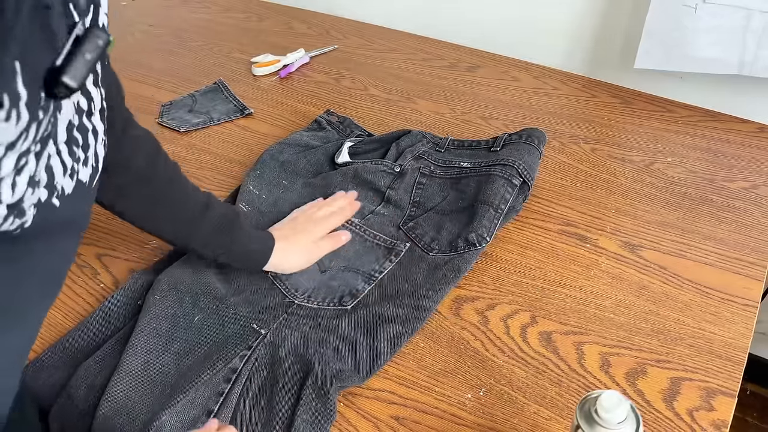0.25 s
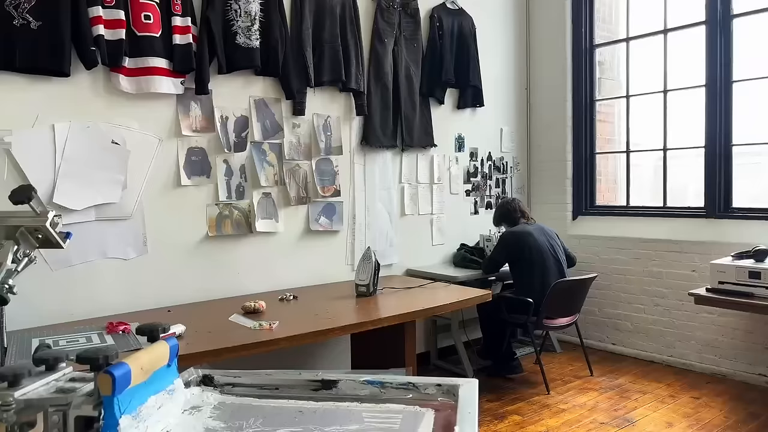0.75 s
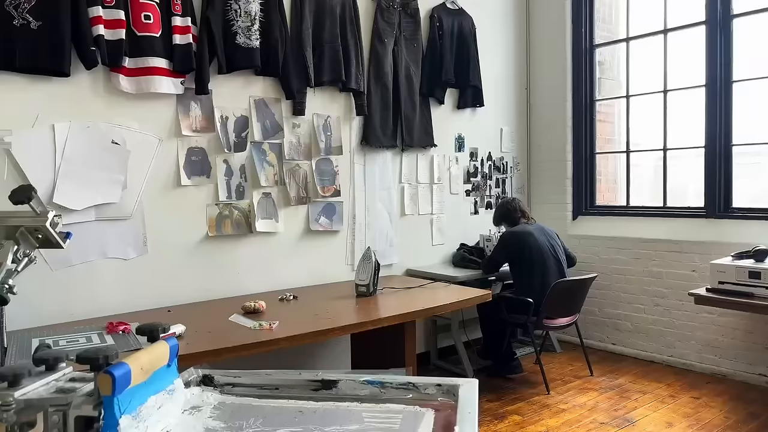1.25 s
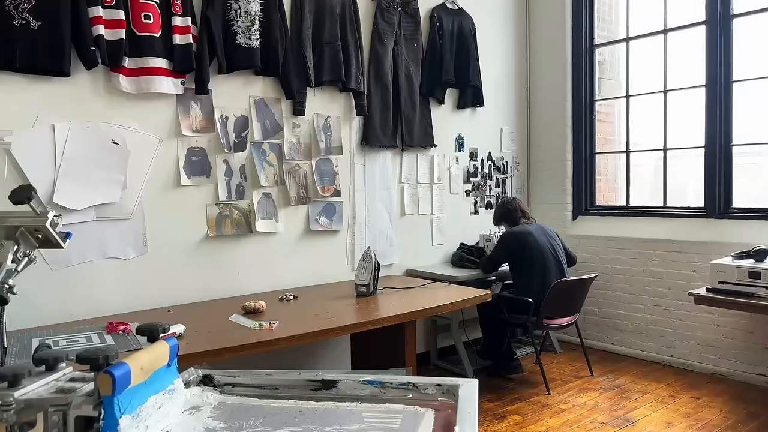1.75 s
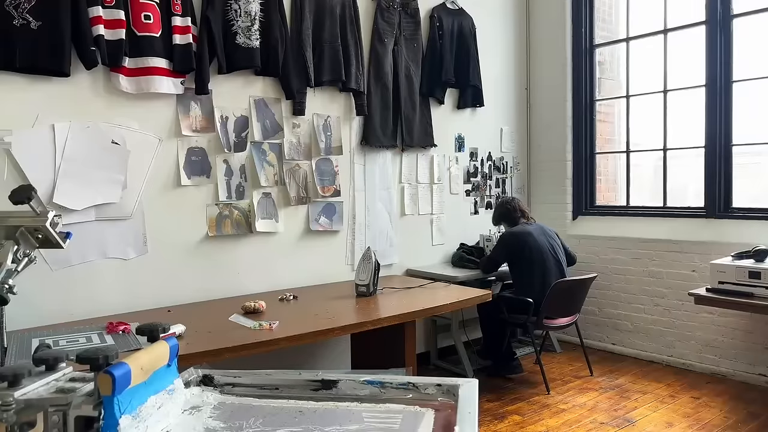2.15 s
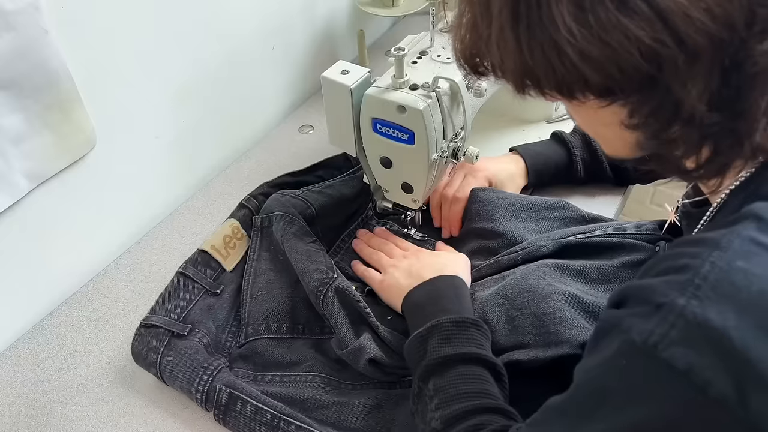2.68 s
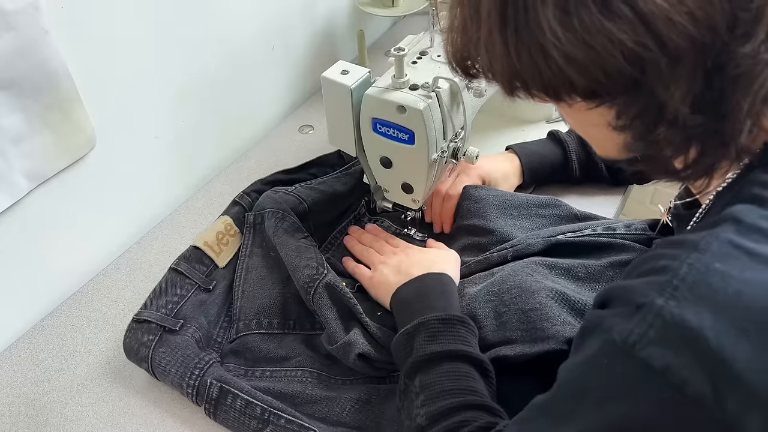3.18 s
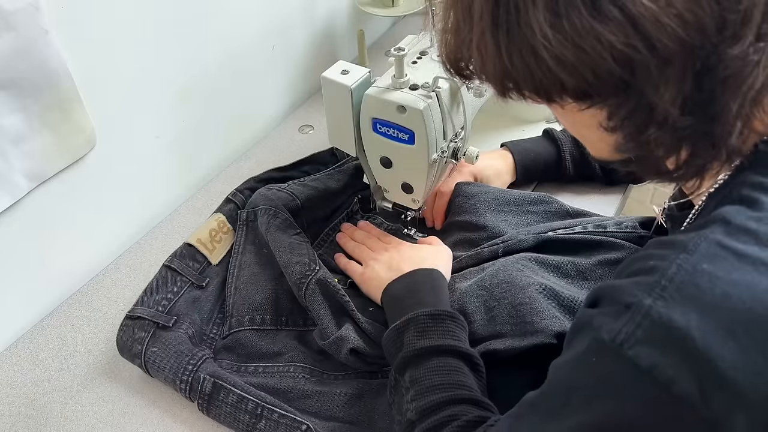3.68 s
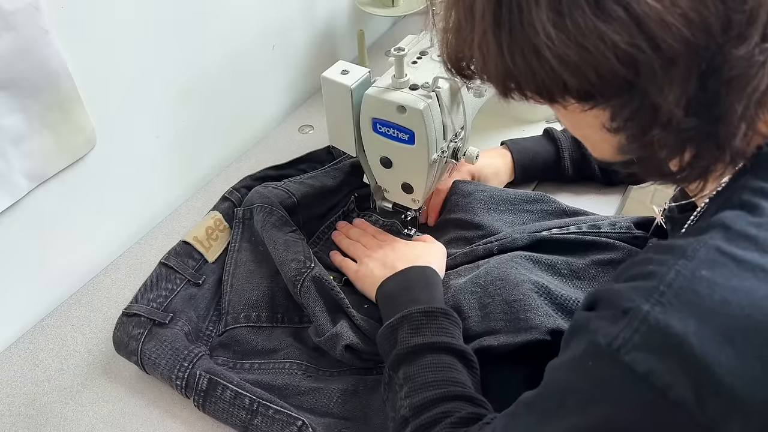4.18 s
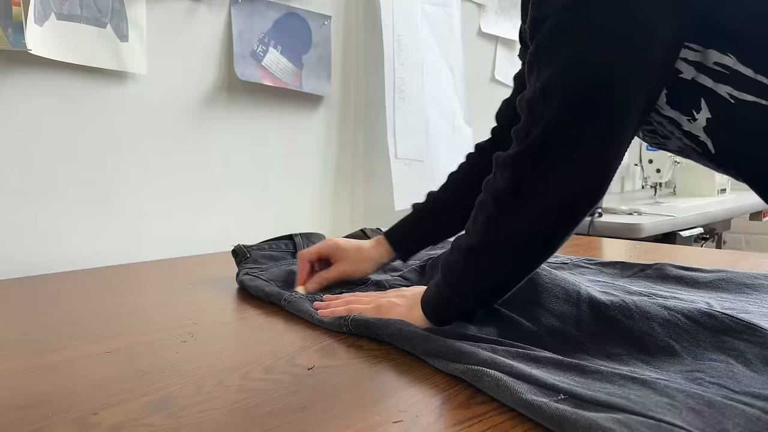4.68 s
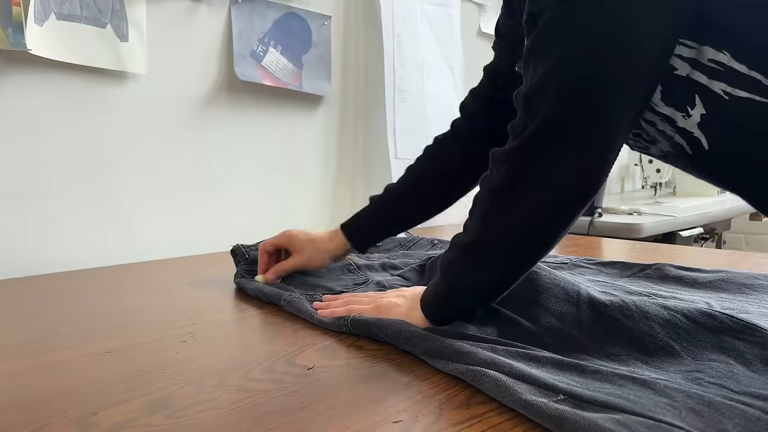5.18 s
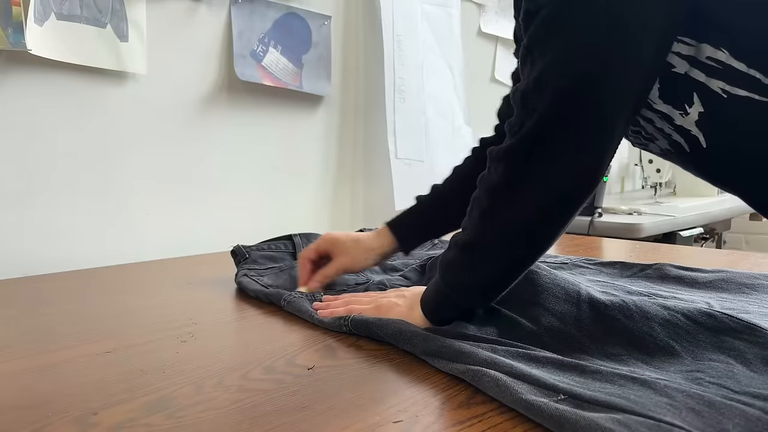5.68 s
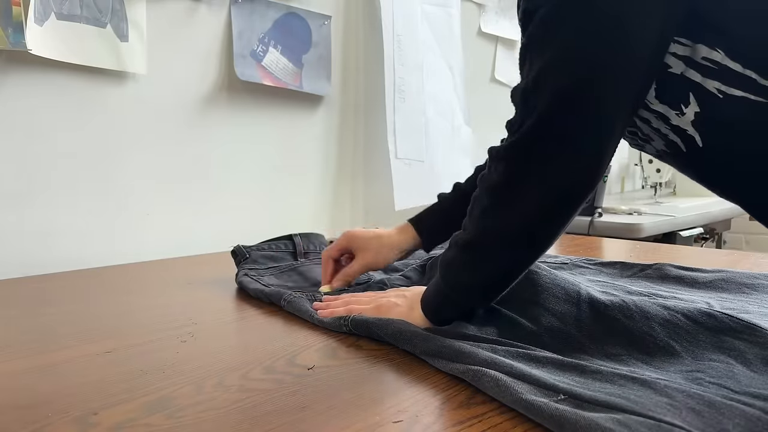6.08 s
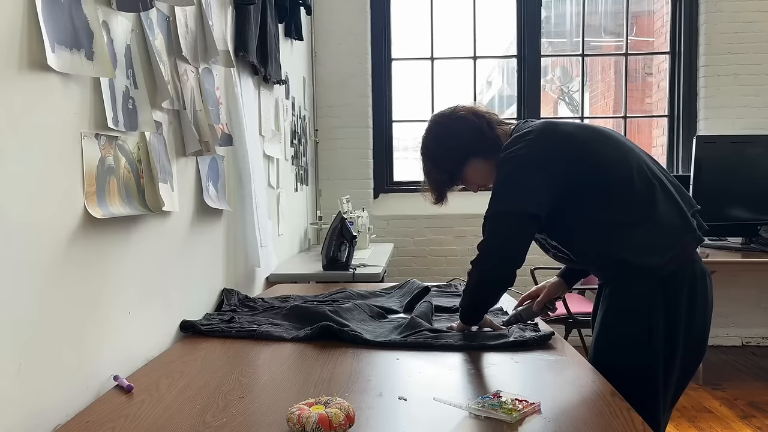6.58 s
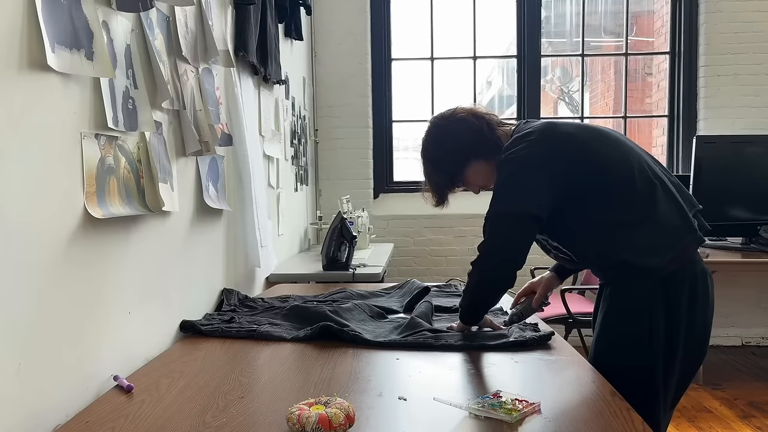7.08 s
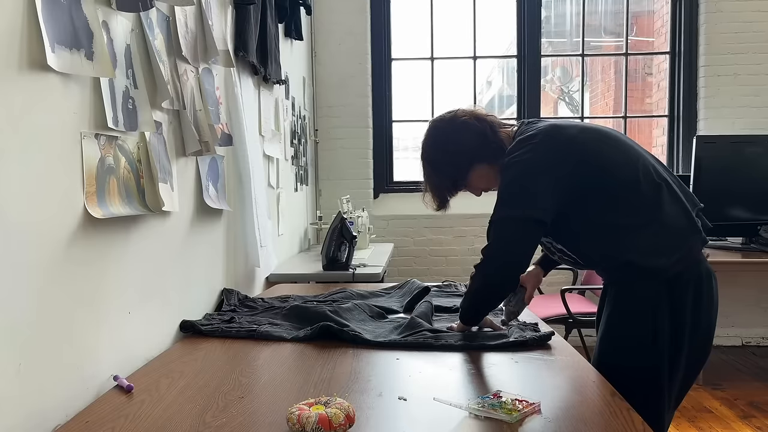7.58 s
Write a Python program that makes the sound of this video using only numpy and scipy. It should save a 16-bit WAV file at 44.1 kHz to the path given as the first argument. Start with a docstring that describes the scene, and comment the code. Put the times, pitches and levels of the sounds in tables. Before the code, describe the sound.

A hand brushes faintly over denim, above a low workshop rumble that swells and sinks throughout. At 0.4 seconds a distant sewing machine cuts in, clacking about seven stitches a second with small pings and rasps, and one sharp click at 1.8 seconds. At 2.4 seconds the machine is suddenly close, louder and about twice as fast, rocking its table, its clacks sharpening toward 4 seconds. It then coasts with a few lighter clicks and ends at 4.4 seconds. Quiet, gritty strokes rub over the cloth until 6.4 seconds, with a few faint taps. Then a handheld rotary tool starts abruptly, with a high, buzzing whine that wavers slightly in pitch. Its bit grinds the denim in short presses, with hiss and thin squeaks, until the end near 7.9 seconds. Its cooling air puffs against the microphone, most strongly around 6.8 seconds.

```python
"""Denim in a sewing workshop

Five shots cut together: a hand smooths denim; a sewing machine clacks through its stitches far off,
then close by until it slows to a stop; short strokes rub over the cloth; and a mains rotary tool
whines and grinds on the denim while its cooling air puffs against the microphone."""
import sys
import numpy as np
from scipy import signal
from scipy.fft import rfft, irfft, next_fast_len
from scipy.io import wavfile
from scipy.ndimage import uniform_filter1d

SR = 44100
rng = np.random.default_rng(int(sys.argv[2]) if len(sys.argv) > 2 else 0)


def master(y):
    """Save y as 16-bit WAV."""
    cut = np.clip(np.atleast_2d(y).T, -1, 1)
    pcm = np.round(cut * 32767)  # scale
    wavfile.write(sys.argv[1], SR, pcm.astype(np.int16))


N = 346185
TIME = np.arange(N) / SR
SIZE = next_fast_len(N + SR // 4)
HZ = np.arange(SIZE // 2 + 1) * SR / SIZE + 1e-3
PEDAL_UP_S, MACHINE_CUT_S, TOOL_CUT_S = 4.078, 4.42, 6.41

# stitches heard far off: (time [s], arm clack [dB], feed effort [dB], needle ping [dB])
FAR_STITCHES = [(0.4219, -40.5, -6, -40), (0.5494, -36, -1, -43.5), (0.6806, -37, 1, -45),
                (0.8127, -39, -1, -47), (0.9459, -41, -0.5, -40.5), (1.0816, -35.5, 3.5, -41),
                (1.219, -36, 0, -37.5), (1.3497, -38.5, 2.5, -40), (1.487, -36, -5, -38.5),
                (1.631, -38.5, -4.5, -39.5), (1.7879, -41, 6.5, -42), (1.9308, -35.5, 1, -42),
                (2.0644, -38, -1.5, -51), (2.194, -36, -1, -41.5), (2.3148, -41, 3, -36),
                (2.4457, -39, 0, -58)]
# stitches heard close by: (time [s], arm clack [dB], feed effort [dB], hook rattle [dB])
NEAR_STITCHES = [(2.4494, -33, -17, -29), (2.5371, -34, 1.5, -28.5), (2.6206, -30, -0.5, -27.5),
                 (2.702, -28, -4, -31.5), (2.7794, -29.5, -1, -31.5), (2.856, -27.5, 0, -29.5),
                 (2.9284, -28, 3, -28.5), (3.0033, -27.5, 0.5, -31), (3.073, -31, -3, -32),
                 (3.1451, -34, 5.5, -31.5), (3.2153, -25, 3.5, -29), (3.2886, -27, 2.5, -29.5),
                 (3.3595, -26.5, 3, -30.5), (3.434, -25.5, 2.5, -28.5), (3.5033, -29.5, 6.5, -34),
                 (3.5768, -25.5, -1, -29.5), (3.6486, -28.5, 3.5, -30), (3.7205, -26, 2.5, -29),
                 (3.7922, -23.5, 0, -30), (3.8642, -25.5, 3.5, -30), (3.938, -24, -2.5, -31),
                 (4.0209, -29, -3.5, -33.5), (4.2346, -33.5, -17, -34)]
# broad tone of the slow-running machine: (frequency [Hz], level [dB])
SLOW_SPECTRUM = [(71, -42.5), (120, -4), (188, -18), (236, 0.5), (284, -13.5), (524, -4.5), (742, -14.5),
                 (1050, -2), (2530, 0.5), (5300, -22.5), (15000, -37.5), (16000, -33)]
# its body modes: (frequency [Hz], width [Hz], level [dB])
SLOW_MODES = [(248, 5.4, -4), (473, 160, -2), (1051, 41, -2.5), (1207, 37, -3.5), (1930, 14, -4.5),
              (2290, 110, -3.5), (2517, 35, 0.5), (6300, 190, -22), (7540, 130, -28), (8000, 180, -25),
              (8570, 200, -27), (9800, 220, -34), (14900, 89, -21.5), (15200, 51, -32), (15400, 47, -33)]


def from_db(db):
    """Gain of a level in dB."""
    return 10 ** (np.asarray(db) / 20)


def curve(points):
    """A line through (time, value) points, at every sample."""
    return np.interp(TIME, *np.transpose(points))


def shot(start, end):
    """One while a shot lasts, with hard cuts."""
    return np.clip(np.minimum(TIME - start, end - TIME) / .002, 0, 1)


def trapezoid(start, rise, hold, fall):
    """Zero, up to one, held, back to zero."""
    return np.interp(TIME, np.cumsum([start, rise, hold, fall]), [0, 1, 1, 0])


def wander(per_s):
    """Slow random drift, spread about 1."""
    knots = np.clip(rng.standard_normal(400), -2, 2)
    return np.interp(TIME * per_s, np.arange(400), knots)


def gritty(grit_db, grains_per_s):
    """Noise whose loudness jumps from grain to grain; rms 1."""
    steps = rng.exponential(1, int(N / SR * 4000))[(TIME * grains_per_s).astype(int)]
    noise = rng.standard_normal(N) * from_db(grit_db * np.minimum(steps, 4))
    return noise / noise.std()


def resonance(hz, width_hz):
    """Response of one mode, 1 at its peak."""
    return 1 / (1 + 1j * (HZ ** 2 - hz ** 2) / (HZ * width_hz))


def colour(spectrum, modes=(), broad_db=0):
    """A broad spectrum with modes standing out of it."""
    hz, db = np.transpose(spectrum)
    broad = from_db(np.interp(np.log(HZ), np.log(hz), db) + broad_db)
    return broad + sum(from_db(db) * resonance(hz, width) for hz, width, db in modes)


def through(x, response, low_hz, high_hz):
    """Filter by one band of a response, scaled so that white noise keeps its power."""
    band = response / np.sqrt((1 + (low_hz / HZ) ** 8) * (1 + (HZ / high_hz) ** 8))
    band = band / np.sqrt(np.mean(np.abs(band) ** 2))
    return irfft(rfft(x, SIZE) * band, SIZE)[:N]


def rumble_levels():
    """Deep and upper rumble in dB: each shot has a wandering floor, and swells rise out of it."""
    # floor of each shot: (start [s], deep [dB], upper [dB], wander [dB])
    floors = [(0, -47.5, -62, -1.5), (.42, -55, -53, 3), (2.43, -40, -49.5, 0.5), (4.07, -53, -61, 3),
              (6.42, -73, -75, 0)]
    # low swells: (peak time [s], rise [s], fall [s], deep [dB], upper [dB])
    swells = [(0.001, 0.013, 0.14, -34, -61), (.39, .1, .3, -45, -55), (1.3, .6, 0.68, -49, -48.5),
              (1.8, 0.23, .4, -47, -49.5), (2.47, .1, 0.44, -36.5, -43), (4.07, .1, 0.71, -44.5, -52),
              (4.72, .08, .8, -53, -53.5), (5.08, 0.07, .45, -57, -43), (5.25, 0.23, 0.34, -42, -51.5),
              (5.46, 0.072, 0.53, -42, -63), (6.3, 0.13, 0.56, -41.5, -56), (6.82, 0.077, 0.1, -27, -40),
              (7.03, .12, 0.22, -32, -43.5), (7.3, .3, .1, -50, -60), (7.5, 0.13, 0.14, -47, -66),
              (7.74, 0.24, 0.25, -48.5, -53)]
    span_db = 26   # climbed in the rise, lost in the fall
    starts, *bands, wander_db = np.transpose(floors)
    now = np.searchsorted(starts, TIME, "right") - 1
    levels = []
    for band, floor_db in enumerate(bands):
        swells_db = [db[band] - span_db * np.maximum((at - TIME) / rise, (TIME - at) / fall)
                     for at, rise, fall, *db in swells]
        levels.append(np.max([floor_db[now] + wander_db[now] * wander(8.3), *swells_db], axis=0))
    return levels


def table_shake():
    """The needle bar rocks the table once a stitch."""
    # rocking motion: (multiple of the stitch rate, level [dB], lag [turns])
    harmonics = [(1, 3, 0.32), (2, 2.5, 0.26), (3, -4.5, 0.18)]
    times = np.array(NEAR_STITCHES)[:, 0]
    turns = np.interp(TIME, times, np.arange(len(times)))
    return sum(from_db(db) * np.cos(2 * np.pi * k * (turns - lag)) for k, db, lag in harmonics)


def rumble():
    """Building and handling rumble; close to the machine the rocking table carries the deep part."""
    deep_db, upper_db = rumble_levels()
    deep = through(rng.standard_normal(N), 1 / HZ, 8.8, 31.4)
    upper = through(rng.standard_normal(N), 1 / HZ, 53.5, 116)
    rocking = np.interp(TIME, [2.42, 2.45, 4.0, 4.08], [0, 1, 1, 0])
    deep = (1 - 0.73 * rocking) * deep + rocking * table_shake()
    return from_db(deep_db - 2.5) * deep + from_db(upper_db - 1.5) * upper


def clacks_and_taps():
    """Needle bar clacks growing louder over the last fast stitches, plus scattered clicks and taps."""
    # noisy cracks with a thin tick on top: (time [s], peak [dB], centre [Hz], tick against crack [dB])
    hits = [(0.346, -47, 1150, -30), (1.834, -12, 3240, -43), (2.857, -27, 3500, -31),
            (2.929, -28, 3500, -35), (3.487, -23.5, 2230, -27), (3.704, -29, 2226, -29),
            (3.776, -24, 2260, -27), (3.839, -18.5, 2090, -31), (3.846, -31, 2240, -25),
            (3.918, -17.5, 2110, -28), (3.999, -18.5, 2214, -27), (4.146, -34, 2500, -30),
            (4.179, -22.5, 2260, -34), (4.255, -37, 2170, 4), (4.306, -35, 2660, -30),
            (4.373, -41, 2500, -29), (4.39, -26.5, 2370, -28), (4.417, -41, 2350, -5),
            (4.673, -39, 1120, -31), (4.675, -41, 2600, -12), (5.032, -44, 1150, -28),
            (5.872, -36, 2040, -27), (6.251, -35, 1370, -19)]
    t60_s = 0.038
    out, t = np.zeros(N), TIME[:SR // 10]
    tick_band = signal.butter(2, [4500, 9000], "band", fs=SR, output="sos")
    for at, db, hz, tick_db in hits:
        burst = (rng.standard_normal(len(t)) + 14 * (t == 0)) * from_db(-60 * t / t60_s)
        crack_band = signal.butter(2, [hz / 1.27, hz * 1.196], "band", fs=SR, output="sos")
        crack, tick = signal.sosfilt(crack_band, burst), signal.sosfilt(tick_band, burst)
        tap = crack / np.abs(crack).max() + from_db(tick_db) * tick / np.abs(tick).max()
        out[int(at * SR):][:len(t)] += from_db(db) * tap
    return out


def cloth_strokes():
    """Strokes drag over the twill ribs: fine grit swelling out of a faint rustle."""
    # strokes on the denim: (start [s], rise [s], hold [s], fall [s], peak [dB])
    strokes = [(0.141, .024, .002, 0.013, -57.5), (0.343, 0.0063, .02, .03, -57),
               (4.405, .01, .002, 0.18, -50), (4.683, 0.033, .01, 0.11, -52),
               (4.688, 0.078, .01, 0.24, -45), (5.025, 0.021, .002, 0.028, -57),
               (5.074, 0.024, 0.11, 0.019, -47), (5.179, 0.088, 0.0092, 0.12, -57),
               (5.403, .008, .02, .03, -58.5), (5.404, .12, 0.013, .16, -47),
               (5.602, 0.1, 0.065, 0.027, -52.5), (5.776, 0.11, .01, 0.18, -49.5),
               (5.967, 0.1, .01, 0.16, -50.5), (6.184, 0.072, .005, 0.14, -46),
               (6.35, 0.061, .02, .01, -53)]
    # smoothing shot, then rubbing shot: (start [s], end [s], rustle [dB], treble below rustle [dB],
    # treble's share of a stroke's rise, grit [dB])
    shots = [(0, 0.424, -66, 10, 0.46, -0.2), (4.416, 6.418, -71, 11.5, 0.87, 2.03)]
    # tone of a palm over denim: (frequency [Hz], level [dB])
    palm = [(120, -23), (250, -12), (700, -11.5), (1400, -14.5), (2340, -7.5), (3600, -19.5), (12000, -32),
            (16000, -42)]
    # tone of the rubbing: (frequency [Hz], level [dB])
    rubbing = [(71, -27), (120, -23), (173, -4.5), (272, -10), (308, -9), (643, -5.5), (805, -11),
               (1400, -0.5), (1790, -4), (15000, -25.5), (16000, -40)]
    fullness = 0.79   # under 1: a stroke fills out early and thins late
    out = 0
    for (start, end, rest_db, below_db, share, grit_db), spectrum in zip(shots, (palm, rubbing)):
        swells_db = [(db - rest_db) * trapezoid(*timing) ** fullness for *timing, db in strokes]
        rise_db = np.max(swells_db, axis=0)
        grit, tone = gritty(grit_db, 600) * shot(start, end), colour(spectrum)
        out += through(from_db(rest_db + rise_db) * grit, tone, 120, 3380)
        out += through(from_db(rest_db - below_db + share * rise_db) * grit, tone, 3540, 16000)
    return out


def air_puffs():
    """Cooling air hits the microphone port: a quick push, then a slower swing back."""
    # gusts: (time [s], level [dB], time scale [s])
    puffs = [(6.804, -27.5, 0.0074), (7.016, -42, 0.0079), (7.064, -47, 0.008), (7.162, -50, 0.0069),
             (7.495, -41.5, 0.0085), (7.713, -49.5, 0.009)]
    pressure = np.zeros(N)
    for at, db, length in puffs:
        t = (TIME - at) / length
        pressure += from_db(db) * (np.exp(-2.6 * t ** 2) - 0.27 * np.exp(-(t - 1.8) ** 2))
    flutter = through(rng.standard_normal(N), 1, 40, 202)
    return pressure * (1 + 0.72 * flutter)


def bit_squeaks():
    """The bit squeaks on the cloth in short, slightly rough glides."""
    # squeaks: (start [s], length [s], from [Hz], to [Hz], peak [dB])
    squeaks = [(6.44, .05, 4640, 4780, -60), (6.613, 0.11, 4860, 4820, -49), (6.68, .04, 5050, 4940, -52),
               (6.77, .09, 4820, 4860, -58), (6.885, .035, 5100, 4900, -64), (7.09, .09, 5200, 5140, -53)]
    out, jitter_hz = 0, 18 * wander(45)
    for start, length, from_hz, to_hz, db in squeaks:
        along = np.clip((TIME - start) / length, 0, 1)
        hz = from_hz + (to_hz - from_hz) * along ** 1.5 + jitter_hz
        out += from_db(db) * np.sin(np.pi * along) * np.sin(2 * np.pi * np.cumsum(hz) / SR)
    return out


def bearing_squeals():
    """Bearing squeals and patches of sizzle: bands of noise, each flickering on its own."""
    # squeal bands: (frequency [Hz], width [Hz], relative level [dB], flicker [dB])
    bands = [(4820, 47, -11, 5.5), (6910, 640, -14, 7), (8100, 170, -10.5, 6), (9100, 160, -17, 6),
             (9650, 720, -16.5, 7), (10800, 980, -20, 8.5), (12100, 2000, -23, 9), (13600, 1200, -19, 6),
             (15200, 1000, -15.5, 4)]
    out, white = 0, rng.standard_normal(N)
    for hz, width, db, flicker_db in bands:
        knots = np.clip(rng.standard_normal(200), -2, 1.5)
        flicker = np.interp(TIME * 25, np.arange(200), knots)
        whistle = through(white, resonance(hz, width) ** 2, 100, 20000)
        out += from_db(db + flicker_db * flicker) * whistle
    return out


def bit_pressure_db():
    """Each press of the bit on the cloth comes on quickly, holds and eases off."""
    # presses: (start [s], hold [s], strength [dB])
    presses = [(6.382, 0.4, -2), (6.84, .2, -5), (7.172, 0.13, -1.5), (7.407, 0.063, -0.5), (7.649, .02, 1),
               (7.678, 0.033, -0.5), (7.841, .1, 1.5)]
    lifted_db, rise_s, fall_db_per_s = -10, 0.019, 144
    level_db = np.full(N, lifted_db)
    for start, hold, db in presses:
        attack_db = np.minimum(lifted_db * (start - TIME) / rise_s, 0)
        release_db = fall_db_per_s * (start + hold - TIME)
        level_db = np.maximum(level_db, db + np.minimum(attack_db, release_db))
    return level_db


def grinding(press_db, buzz_db, hiss_db, mains):
    """The bit grinds the denim: one gritty noise in three bands, louder under pressure."""
    # broad tone of the grinding: (frequency [Hz], level [dB])
    spectrum = [(88, -64), (150, -15), (244, -14), (297, -9.5), (504, -2.5), (805, -18), (979, -9),
                (2180, 6.5), (2870, -4.5), (4160, -17), (5460, -28), (8230, -28), (16000, -45)]
    # modes of the tool's body: (frequency [Hz], width [Hz], level [dB])
    modes = [(1400, 500, -8.5), (2260, 380, -9), (3400, 510, 2), (6000, 410, -16)]
    # tone of the hiss: (frequency [Hz], level [dB])
    hiss_spectrum = [(2650, -25), (4500, 2), (5450, -6.5), (6030, -4), (7570, -10.5), (8200, -8),
                     (8640, -13.5), (15100, -23), (16000, -13.5)]
    grit = gritty(1.7, 1200) * (1 + 0.041 * mains)
    body = colour(spectrum, modes, broad_db=3.5)
    dips_db = 0.09 * (buzz_db - buzz_db.max())   # the grinding dips slightly with the buzz
    low = through(from_db(-40.5 + 0.29 * press_db + dips_db) * grit, body, 150, 2700)
    top = through(from_db(-50.5 + press_db + dips_db) * grit, body, 3400, 4200)
    hiss = through(from_db(hiss_db - 3) * grit, colour(hiss_spectrum), 4800, 22000)
    return low + top + hiss


def housing_ring(drive, modes):
    """The tool's housing rings with a drive; rms 1 over the tool's shot."""
    response = sum(from_db(db) * resonance(hz, width) ** 2 for hz, width, db in modes)
    ring = through(drive, response, 300, 20000)
    return ring / ring[TIME > TOOL_CUT_S].std()


def commutator(angle, mains, buzz_db):
    """Commutator tones sound while current flows, twice a mains cycle, and ring the housing."""
    # commutator overtones: (multiple of the shaft speed, level [dB])
    orders = [(16, 4), (24, -3.5), (32, -10)]
    # housing modes of the lower whine: (frequency [Hz], width [Hz], level [dB])
    lower_modes = [(3850, 400, 2), (5620, 300, 0), (7950, 300, -16)]
    # housing modes of the upper whine: (frequency [Hz], width [Hz], level [dB])
    upper_modes = [(4180, 280, 0), (4490, 330, 1), (5940, 400, -6)]
    # loudness of the upper whine: (time [s], level [dB])
    upper_levels = [(6.41, -56), (6.95, -52.5), (7.05, -52), (7.14, -47.5), (7.3, -50.5), (7.5, -51.5),
                    (7.62, -50.5), (7.72, -51.5), (7.85, -48)]
    bars, buzz_hz, buzz_width_hz = 8, 2210, 364
    sharp_pulses, soft_pulses = np.exp(7.5 * (mains - 1)), np.exp(2.2 * (mains - 1))
    overtones = sum(from_db(db) * np.sin(k * angle) for k, db in orders)
    buzz = housing_ring(sharp_pulses * np.sin(bars * angle), [(buzz_hz, buzz_width_hz, 0)])
    lower = housing_ring(sharp_pulses * overtones, lower_modes)
    upper = housing_ring(soft_pulses * overtones, upper_modes)
    turned = np.clip((TIME - 6.93) / .15, 0, 1)   # the tool turns another side to the microphone
    lower_db = -52.5 - 2 * turned + 3 * wander(22)
    return from_db(buzz_db) * buzz + from_db(lower_db) * lower + from_db(curve(upper_levels)) * upper


def rotary_tool():
    """A mains motor spins the bit: commutator, fan and unbalance tones all follow its shaft."""
    # shaft speed: (time [s], speed [turns/s])
    speeds = [(6.41, 246.1), (6.86, 246.8), (7.0, 250.8), (7.07, 252), (7.17, 259), (7.25, 252.3),
              (7.31, 250.3), (7.41, 256.8), (7.52, 250), (7.635, 264.3), (7.73, 252.2), (7.83, 263),
              (7.85, 263)]
    # hum of the unbalanced shaft: (multiple of the shaft speed, level [dB])
    unbalance = [(1, -3), (2, -3), (3, -16), (4, -7), (5, -8), (6, -9), (7, -10)]
    # loudness of the commutator buzz: (time [s], level [dB])
    buzz_levels = [(6.41, -33.5), (6.785, -32), (6.806, -44), (6.862, -35.5), (6.91, -39), (6.974, -30),
                   (7.03, -44), (7.132, -35), (7.212, -35), (7.288, -42), (7.352, -36), (7.452, -42),
                   (7.484, -34.5), (7.504, -47), (7.624, -45), (7.684, -39.5), (7.85, -39)]
    pulses_per_s, fan_blades = 120, 18
    angle = 2 * np.pi * np.cumsum(uniform_filter1d(curve(speeds), size=1100)) / SR
    mains = np.cos(2 * np.pi * pulses_per_s * (TIME - .0045))
    buzz_db, press_db = curve(buzz_levels), bit_pressure_db()
    hiss_db = -51 + 0.64 * press_db
    whine = commutator(angle, mains, buzz_db)
    grind = grinding(press_db, buzz_db, hiss_db, mains)
    fan = from_db(-59 + 2.5 * wander(12)) * np.sin(fan_blades * angle)
    hum = from_db(-45 + press_db) * sum(from_db(db) * np.sin(k * angle + k * k) for k, db in unbalance)
    return whine + grind + fan + hum + bit_squeaks() + from_db(hiss_db) * bearing_squeals()


def drive_whine():
    """Thin wavering whistles of the sewing machine's drive."""
    # whistles: (frequency [Hz], width [Hz], level [dB], start [s])
    whistles = [(8100, 79, -78, 2.9), (15300, 350, -75, .421)]
    out, white = 0, rng.standard_normal(N)
    for hz, width, db, start in whistles:
        whistle = through(white, resonance(hz, width) ** 2, 100, 20000)
        out += from_db(db) * shot(start, MACHINE_CUT_S) * whistle
    return out


def needle_pings():
    """The needle bar pings once between each far stitch and the next."""
    # ring of the needle bar: (frequency [Hz], level [dB], time to fall 60 dB [s])
    modes = [(3260, 9.5, 0.015), (3430, 1.5, 0.017), (13100, -10, .01)]
    times, _, _, ping_db = np.transpose(FAR_STITCHES)
    ping_times = times[:-1] + .543 * np.diff(times)   # just past half a turn
    clicks = np.full(N, 1e-18)
    clicks[(ping_times * SR).astype(int)] = from_db(ping_db[:-1] - 3.5)
    out = 0
    for hz, db, t60 in modes:
        r, w = from_db(-60 / (t60 * SR)), 2 * np.pi * hz / SR
        out += signal.lfilter([0, from_db(db) * np.sin(w)], [1, -2 * r * np.cos(w), r * r], clicks)
    return out


def feed_rasps():
    """The feed drags thick cloth: short rough rasps that start at once and stop quickly."""
    # drags: (start [s], relative level [dB])
    rasps = [(0.602, -34), (1.118, -25), (1.256, -24), (1.391, -23.5), (1.531, -30.5), (1.972, -27.5),
             (2.105, -33), (2.363, -29.5)]
    # resonances of a rasp: (frequency [Hz], width [Hz], level [dB])
    modes = [(232, 11, 9), (510, 110, -1), (1150, 230, -8.5), (1540, 200, -5), (1850, 97, -1.5)]
    drag = sum(from_db(db - 11) * trapezoid(at, rise=0.0018, hold=0.03, fall=0.015) for at, db in rasps)
    body = sum(from_db(db) * resonance(hz, width) for hz, width, db in modes)
    return through(drag * gritty(2.2, 500), body, 240, 1820)


def coasting():
    """With the pedal let up, the machine rolls on with the lighter rattle of slow running."""
    lumps = from_db(-51.5 + 3 * wander(30.04)) * shot(PEDAL_UP_S, MACHINE_CUT_S)
    body = colour(SLOW_SPECTRUM, SLOW_MODES, broad_db=-3)
    return through(lumps * gritty(3.5, 1200), body, 230, 3200)


def contact_power(at, peaks, rise_s, decay_s):
    """Power of a rattle: it climbs exponentially to each contact and dies away after it."""
    marks = np.full(N, 1e-18)
    marks[at] = peaks
    tail = signal.lfilter([1], [1, -np.exp(-1 / (decay_s * SR))], marks)
    lead_in = signal.lfilter([0, 1], [1, -np.exp(-1 / (rise_s * SR))], marks[::-1])[::-1]
    return lead_in + tail


def stitching(times, levels_db, feed_db, contacts, whirr_db, spectrum, modes, broad_db, scatter_db):
    """Each stitch is a round of contacts, each a blow and a short rattle, over a running whirr."""
    # hook hiss, chatter, arm clack, bed knock: (low edge [Hz], high edge [Hz], grit [dB])
    parts = [(7000, 20000, 2.2), (3500, 7000, 2.0), (900, 3500, 1.2), (130, 900, .8)]
    power, blows = np.zeros((2, 4, N))
    gap_after = np.diff(times, append=2 * times[-1] - times[-2])
    gap_before = np.diff(times, prepend=2 * times[0] - times[1])
    for turn, rise, decay, *part_db, blow_share in contacts:
        at = ((times + turn * (gap_after if turn > 0 else gap_before)) * SR).astype(int)
        # the feed's effort weighs on the later contacts of a turn
        effort_db = (feed_db if turn > .12 else 0) + scatter_db * rng.standard_normal(len(times))
        envelope = contact_power(at, from_db(effort_db) ** 2, rise, decay)
        for part, level_db in enumerate(levels_db):
            gain = from_db(level_db + part_db[part])
            power[part] += envelope * np.interp(np.arange(N), at, gain) ** 2
            if part > 1:   # arm and bed also take a blow: a share of the rattle's energy in one sample
                blows[part, at] += gain * from_db(effort_db) * np.sqrt(blow_share * decay * SR)
    rattle_tone = colour(spectrum, modes, broad_db)
    blow_tone = colour(spectrum, modes, -40)   # almost pure ringing
    whirr_tone = colour(spectrum, modes, broad_db + 3)   # running noise wakes the modes less
    out = 0
    for rattle_power, blow, db, (low_hz, high_hz, grit_db) in zip(power, blows, whirr_db, parts):
        out += through(np.sqrt(rattle_power) * gritty(grit_db, 1200), rattle_tone, low_hz, high_hz)
        out += through(blow, blow_tone, low_hz, high_hz)
        out += through(from_db(db) * gritty(grit_db, 1200), whirr_tone, low_hz, high_hz)
    return out


def far_machine():
    """The sewing machine stitches slowly, far off; the bed's knock follows the arm's clack."""
    # contacts of one stitch: (position [turns], rise [s], decay [s], hook hiss [dB], chatter [dB],
    # clack [dB], knock [dB], blow's share of the energy)
    contacts = [(-.17, .003, .006, -19, -7.5, -9, -17, .1), (.02, .002, .004, -12.5, -6.5, -2, -1.5, .2),
                (.1, 0.00069, 0.00082, -9, -19, -4, -5, .2),
                (0.33, 0.0056, 0.013, -36, -18, -8.5, -1.5, 0.19),
                (0.531, 0.00034, 0.0065, -29, -20.5, -5.5, -7, 0.5)]
    times, clack_db, feed_db, _ = np.transpose(FAR_STITCHES)
    hook_db = np.full(len(times), -36.5)
    knock_db = -45 + 0.71 * (clack_db - clack_db.mean())
    whirr_db = [-70, -58, -46, -50.5]   # hook hiss, chatter, clack, knock
    return stitching(times, (hook_db, hook_db, clack_db, knock_db), feed_db, contacts, whirr_db,
                     SLOW_SPECTRUM, SLOW_MODES, broad_db=-1.5, scatter_db=2)


def near_machine():
    """The sewing machine runs fast, close by; its whirr drops as the pedal is let up."""
    # contacts of one stitch: (position [turns], rise [s], decay [s], hook hiss [dB], chatter [dB],
    # clack [dB], knock [dB], blow's share of the energy)
    contacts = [(-.22, 0.00058, 0.0017, -25, -13, -2, -13, 0.16),
                (-.02, 0.0011, 0.0055, -19.5, -15, -0.5, -7, 0.093),
                (0.041, 0.0022, 0.0018, -13, -12.5, -8, 0, 0.15),
                (.17, .002, 0.0058, -38, -22.5, -14.5, -1.5, 0.86),
                (0.501, 0.00046, 0.0027, -42, -33, -20, -2.5, 0.33)]
    # broad tone close by: (frequency [Hz], level [dB])
    spectrum = [(71, -47), (120, -10.5), (226, -16), (284, -11.5), (535, -9), (757, -17), (1340, -5.5),
                (1720, -12), (2240, -2), (3240, -14), (10600, -31.5), (16000, -65)]
    # body modes close by: (frequency [Hz], width [Hz], level [dB])
    modes = [(229, 13.5, -4.5), (439, 26, -12.5), (535.7, 21, -3), (601, 41, -12.5), (1390, 250, -13.5),
             (1901, 12.4, 6), (2026, 20, 3.5), (2229, 86, 7.5), (2520, 39, 2), (2640, 170, -26.5),
             (3460, 72, -16), (4670, 52, -28), (6050, 180, -24), (7720, 570, -29), (8850, 470, -33),
             (10120, 400, -22.5), (14100, 370, -28)]
    # change in the whirr at pedal-up: (hook hiss [dB], chatter [dB], clack [dB], knock [dB])
    drops_db = [-8, -11, -12, -9.5]
    times, clack_db, feed_db, hook_db = np.transpose(NEAR_STITCHES)
    knock_db = -38.5 + 0.73 * (clack_db - clack_db.mean())
    pedal_up = np.clip((TIME - PEDAL_UP_S) / 0.014, 0, 1)
    whirr_db = [db + drop * pedal_up for db, drop in zip([-71, -56, -38.5, -46.5], drops_db)]
    return stitching(times, (hook_db, hook_db, clack_db, knock_db), feed_db, contacts, whirr_db,
                     spectrum, modes, broad_db=-2, scatter_db=0)


def scene():
    """The shots follow one another over the rumble, in mono."""
    out = far_machine() * shot(.421, 2.428) + near_machine() * shot(2.426, MACHINE_CUT_S)
    out += coasting() + drive_whine() + needle_pings() + feed_rasps()
    out += cloth_strokes() + clacks_and_taps() + rumble()
    out += rotary_tool() * shot(TOOL_CUT_S, 8) + air_puffs()
    return out[None]


def record(dry):
    """A steep low-pass cuts the very top."""
    stop_hz = 16100
    return signal.sosfilt(signal.cheby2(16, 60, stop_hz, fs=SR, output="sos"), dry)


dry = scene()
out = record(dry)
master(out)
```